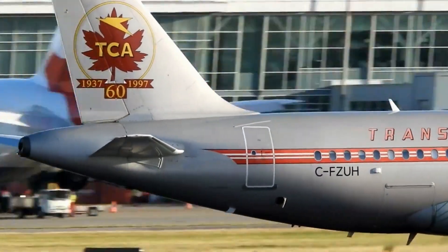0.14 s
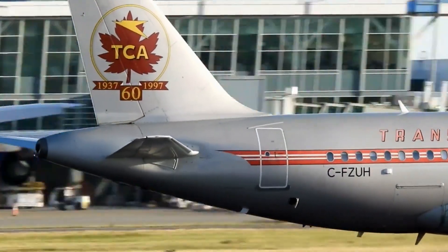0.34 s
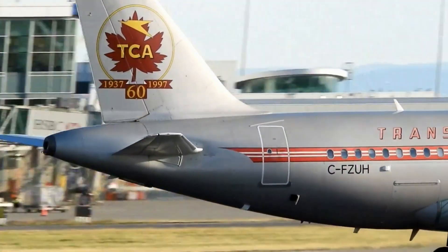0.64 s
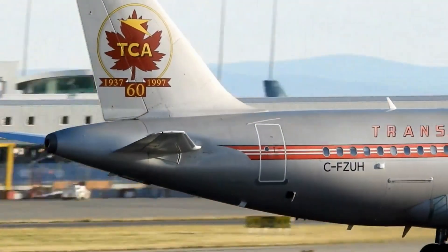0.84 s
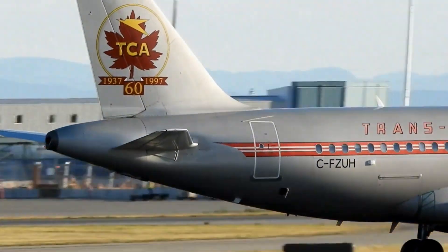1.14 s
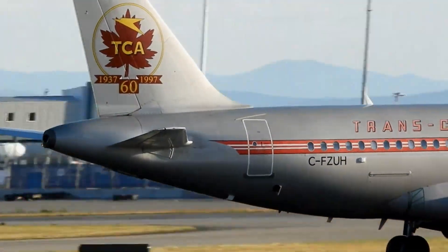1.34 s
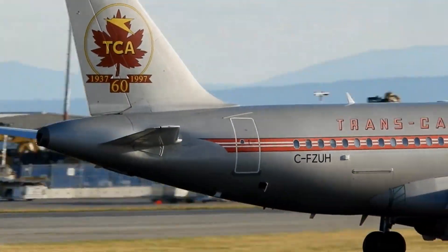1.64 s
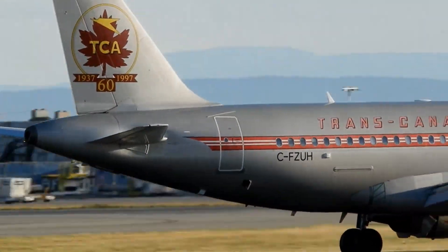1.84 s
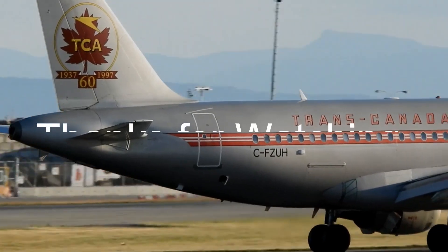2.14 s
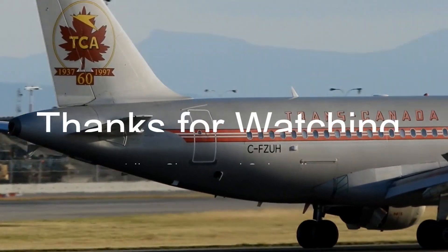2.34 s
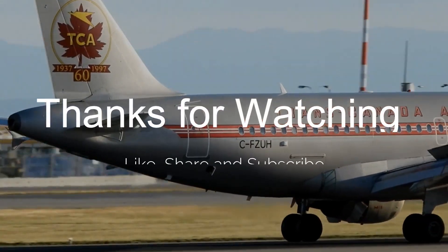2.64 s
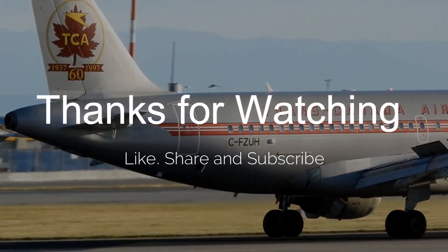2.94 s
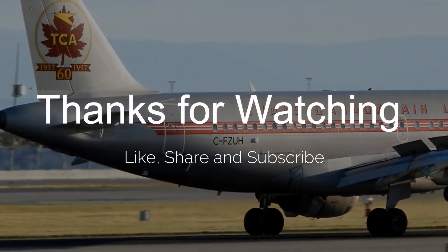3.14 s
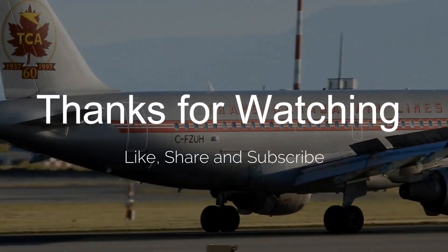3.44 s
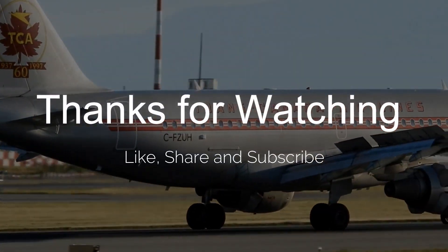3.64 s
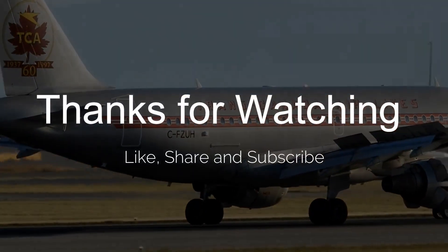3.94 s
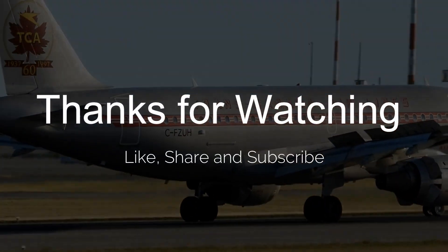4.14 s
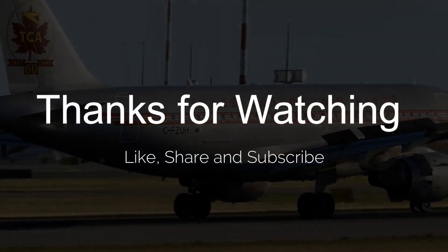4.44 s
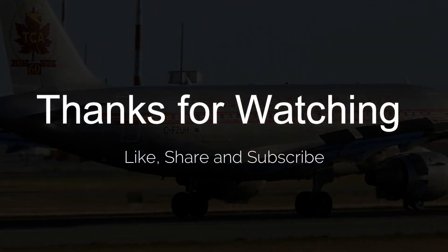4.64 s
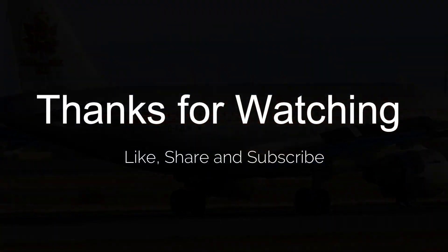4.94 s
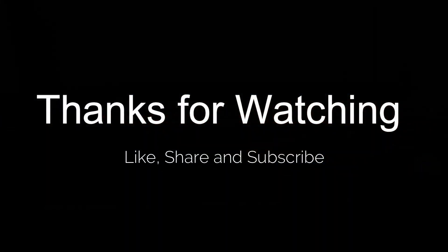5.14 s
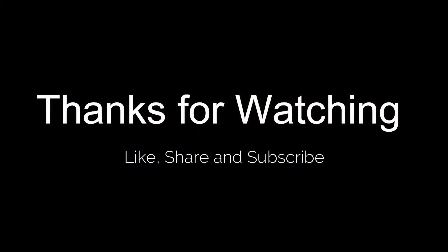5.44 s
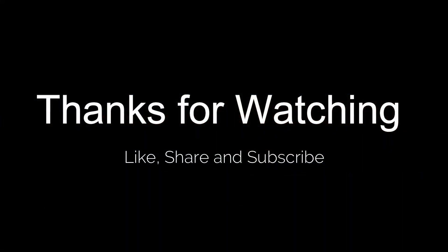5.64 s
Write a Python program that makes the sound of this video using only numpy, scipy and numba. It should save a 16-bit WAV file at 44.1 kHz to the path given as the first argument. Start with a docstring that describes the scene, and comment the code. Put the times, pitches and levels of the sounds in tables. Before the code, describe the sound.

An airliner rolls along a runway with engines in reverse: a dense, surging broadband roar over a shaky low drone, strongest at the start. Midway, a small bird close on the right gives a quick run of sharp chirps, while low gusts bump the microphone. Open airfield, stereo outdoor microphone with faint hiss. From about halfway the whole sound fades evenly to silence.

```python
"""A turbulent jet roar surges over a low drone: an airliner rolls along a runway in reverse thrust.
The roar is noise shaped in octaves, coloured by resonances, reflections and cancellations; the drone is a shaken tone.
Light gusts, as low-frequency noise bursts, buffet the microphone, and a small bird chirps close by
on the right in swept sines. The recorder adds faint filtered hiss, and everything is faded out."""
import sys
import numpy as np
from scipy import signal
from scipy.fft import rfft, irfft, next_fast_len
from scipy.io import wavfile
from numba import njit

SR = 44100
rng = np.random.default_rng(int(sys.argv[2]) if len(sys.argv) > 2 else 0)


def unload_wav(signal):
    """Save mono or channel-first audio to the path in sys.argv[1] as 16-bit WAV at rate SR, clipped to [-1, 1]."""
    wavfile.write(
        sys.argv[1],
        SR,
        np.round(np.clip(np.atleast_2d(signal).T, -1, 1) * 32767).astype(np.int16),
    )


N = 255322
TIME = np.arange(N) / SR
FREQ = np.maximum(np.arange(N // 2 + 1) * SR / N, 1)
ROLL_END_S = 5.366  # the fade-out reaches silence here too
TRAVELLED = np.minimum(TIME / ROLL_END_S, 1)  # share of the roll completed


def undb(db):
    """Amplitude ratio from a level: twenty decibels are a factor of ten."""
    return 10 ** (np.asarray(db) / 20)


def unit(x):
    """Normalisation of the mean power: rms 1."""
    return x / np.sqrt(np.mean(x ** 2))


def curves(table):
    """Linear interpolation in time of each column of a table."""
    s, *columns = np.transpose(table)
    return [np.interp(TIME, s, column) for column in columns]


def colour(points):
    """Spectral envelope in dB: points (f/Hz, level/dB) joined on a log-frequency axis."""
    hz, db = np.transpose(points)
    return np.interp(np.log(FREQ), np.log(hz), db)


def filtered(x, gain):
    """Linear filtering: the spectrum is multiplied by a gain at each frequency."""
    return irfft(rfft(x) * gain, N)


def walk(rate_hz):
    """Low-passed random motion of rms 1, with changes up to about rate_hz a second."""
    return unit(filtered(rng.standard_normal(N), np.exp(-(FREQ / rate_hz) ** 2)))


def bell(peak_s, length_s):
    """Gaussian envelope in time, down to 1/e at length_s on either side of its peak."""
    return np.exp(-((TIME - peak_s) / length_s) ** 2)


def turbulence(burst_db, burst_hz):
    """Intermittency of turbulence: noise whose level rises and falls in brief uneven bursts."""
    return rng.standard_normal(N) * unit(undb(burst_db * walk(burst_hz)))


@njit
def resonance(x, hz, width):
    """Second-order band-pass with a moving centre, gain 1 at the centre."""
    y, band, low = np.empty(len(x)), 0., 0.
    for i in range(len(x)):
        g = np.tan(np.pi * hz[i] / SR)
        damping = width / hz[i]
        v = (band + g * (x[i] - low)) / (1 + g * (g + damping))
        band = 2 * v - band
        low = low + 2 * g * v
        y[i] = damping * v
    return y


def buffeting():
    """Wind noise: turbulent pressure on each microphone port, independent between the two."""
    # gusts: t/s of the peak, level/dB
    gust_table = [(.5, -35.5), (3.77, -28.5), (4.45, -32), (5.15, -38.5)]
    # spectrum of the buffeting: f/Hz, relative level per Hz/dB
    buffet_points = [(25, -24.5), (60, -20), (95, -9.5), (150, 2), (220, -1.5), (330, -21), (600, -22.5),
                     (1500, -49.5), (6000, -90.5)]
    rise_s, fall_s, breeze_db = 0.17, 0.21, -47.5  # times to change by a factor e
    wind = undb(breeze_db)
    for peak_s, db in gust_table:
        away = np.maximum((peak_s - TIME) / rise_s, (TIME - peak_s) / fall_s)
        wind = wind + undb(db) * np.exp(-away)
    gain = undb(colour(buffet_points))
    ports = [unit(filtered(turbulence(burst_db=3.0, burst_hz=22), gain)) for _ in range(2)]
    return wind * np.array(ports)


def bird(far_ear_db, far_ear_lag_s, rough, fall_rough, echo_db, echo_s):
    """Frequency modulation: whistles sweep to a sharp top and drop more roughly, with a faint echo."""
    # chirps: t/s at the top, rise/s, fall/s, start f/Hz, top f/Hz, end f/Hz, level/dB
    chirp_table = [ (1.7, .04, .055, 8330, 8400, 8300, -58.5), (1.778, .035, .04, 8400, 8920, 8550, -54),
                   (2.682, .013, .022, 4800, 6650, 5450, -30.5), (2.878, .022, .012, 3600, 3800, 3700, -36),
                   (2.958, .006, .036, 4200, 4450, 3950, -31.5),
                   (3.010, .021, .017, 4200, 6200, 4150, -29.5),
                   (3.164, .011, .012, 4550, 5000, 4650, -30.5),
                   (3.221, .033, .027, 3700, 6750, 5100, -28.5), (3.489, .007, .018, 4050, 4200, 3950, -31),
                   (3.530, .022, .024, 4050, 5950, 3850, -32), (3.683, .013, .012, 4150, 5050, 4200, -30.5),
                   (3.738, .021, .029, 4400, 6800, 5300, -28)]
    song = np.zeros(N)
    wobble = walk(500)
    for top_s, rise, fall, start_hz, top_hz, end_hz, db in chirp_table:
        on = (TIME > top_s - rise) & (TIME < top_s + fall)
        t = TIME[on] - top_s
        rising = t < 0
        away = np.where(rising, -t / rise, t / fall)  # 0 at the top, 1 at either foot
        foot_hz = np.where(rising, start_hz, end_hz)
        sweep_hz = foot_hz + (top_hz - foot_hz) * (1 - away) ** 1.8
        hz = sweep_hz * (1 + np.where(rising, rough, fall_rough) * wobble[on])
        whistle = np.sqrt(2) * np.sin(2 * np.pi * np.cumsum(hz) / SR)
        song[on] += undb(db) * (1 - away ** 6) * whistle
    # diffuse echo: decaying noise, different at each ear
    tail = rng.standard_normal((2, SR // 4)) * np.exp(-TIME[:SR // 4] / echo_s)
    echo = signal.fftconvolve(song[None], tail / np.linalg.norm(tail[0]), axes=1)[:, :N]
    # the left side is shaded and hears it a little later
    left = undb(far_ear_db) * np.interp(TIME - far_ear_lag_s, TIME, song)
    return np.array([left, song]) + undb(echo_db) * echo


def drone(waver, waver_hz):
    """Tone with random modulation: turbulence shakes the strength and phase of a sagging engine tone."""
    # the drone, strongest at first: t/s, level before the overall scaling/dB
    drone_table = [(0, -22), (.12, -20.5), (.39, -26.5), (.47, -41), (.8, -30), (1.1, -38), (1.8, -35),
                   (2.15, -30), (2.8, -30.5), (3.65, -30), (3.85, -36), (4.45, -33), (4.85, -39.5),
                   (5.2, -37.5)]
    steady_hz, excess_hz, settle_s = 158.6, 5.756, 0.76
    level_db, = curves(drone_table)
    hz = steady_hz + excess_hz * np.exp(-TIME / settle_s)
    shaken = 1 + waver * (walk(waver_hz) + 1j * walk(waver_hz))
    tone = np.real(shaken * np.exp(2j * np.pi * np.cumsum(hz) / SR))
    return undb(level_db) * unit(tone)


def thrust():
    """Spectral balance of jet noise: slow level curves of rumble, roar and hiss (dB)."""
    # each of the three: t/s, level change/dB; the wind carries the roar
    rumble_table = [(0, -2), (.11, 3.5), (.36, 2.5), (.5, -5), (.7, -1), (.9, 1.5), (1.0, -2.5), (1.15, 2),
                    (1.35, 0.5), (1.55, -1), (1.85, -1), (2.05, -0.5), (2.55, 0.5), (3.4, 0), (3.55, -2.5),
                    (3.8, -4), (4.25, 2), (4.85, -1), (5.2, -4)]
    roar_table = [(0, 2), (.1, 5.5), (.22, 4), (.28, 1.5), (.42, 4), (.6, 2.5), (.8, 0.5), (.88, -4),
                  (.98, -3.5), (1.1, -1.5), (1.27, 3.3), (1.38, 1), (1.62, 2), (1.82, -0.5), (2.0, 1),
                  (2.2, 2), (2.55, 1.5), (2.68, -6.5), (2.85, -1), (3.05, 1.5), (3.15, 1), (3.3, 2),
                  (3.54, -2), (3.78, 0.5), (3.85, -2), (3.95, 1.5), (4.2, 1.5), (4.3, 4), (4.4, 2),
                  (4.8, 1.5), (4.92, 0.5), (5.2, -1.5)]
    hiss_table = [(0, 2.5), (.2, 2.5), (.3, 6.5), (.4, 7), (.58, 3.8), (.78, -2.5), (.93, -2), (1.04, 3),
                  (1.25, 1), (1.55, -2), (1.86, -2), (1.96, 3.5), (2.07, 2), (2.3, 3), (2.55, 1),
                  (2.8, -2.5), (3.35, -3), (3.88, -2), (4.06, 0), (4.2, 2.5), (4.42, 5), (4.75, 2),
                  (5.2, -2.5)]
    return [curves(table)[0] for table in (rumble_table, roar_table, hiss_table)]


def surges(rumble_db, roar_db, hiss_db, flutter_db, flutter_hz, flicker_db, billow_db, flicker_hz):
    """Level modulation by octave: slow surges, a shared quick flutter and a flicker of its own."""
    anchors = np.log([300, 920, 4200])  # centres of rumble, roar and hiss (Hz)
    flutter = flutter_db * walk(flutter_hz)
    bands = []
    for hz in 70 * 2. ** np.arange(8):
        low, mid, high = (np.interp(np.log(hz), anchors, row) for row in np.eye(3))
        slow = low * rumble_db + mid * roar_db + high * hiss_db
        # the largest eddies make the rumble billow more than the hiss
        flicker = (flicker_db + low * billow_db) * walk(flicker_hz)
        bands.append((hz, slow + flutter + flicker))
    return bands


def through_wind(source, shape_db, bands):
    """Time-varying filtering: coloured noise whose overlapping octaves follow their own level curves."""
    size = next_fast_len(N)
    spectrum = rfft(unit(filtered(source, undb(shape_db))), size)
    hz = np.maximum(np.arange(len(spectrum)) * SR / size, 1)
    octave = np.clip(np.log2(hz / bands[0][0]), 0, len(bands) - 1.0)
    total = 0
    for k, (_, db) in enumerate(bands):
        share = np.maximum(1 - abs(octave - k), 0)
        total = total + irfft(spectrum * share, size)[:N] * undb(db)
    return total


def brief_swells(x):
    """Band-limited amplitude modulation: brief swells of the noise, each around its own pitch."""
    # swells: t/s at the peak, half length/s, f/Hz, width/Hz, boost (0 = none)
    swell_table = [(0.1, 0.047, 240, 120, .7), (0.161, .04, 1400, 800, 0.32), (0.716, 0.028, 320, 116, .8),
                   (0.932, 0.0089, 700, 250, 1), (1.315, 0.028, 290, 160, 1.1),
                   (1.409, 0.0055, 700, 397, 1.5), (1.85, 0.028, 470, 220, .7),
                   (2.727, 0.017, 720, 300, 1.7), (2.79, .018, 380, 400, .8),
                   (3.257, 0.0021, 750, 900, 1.8), (3.393, 0.0067, 280, 161, .8),
                   (4.283, 0.012, 850, 300, 1.7), (4.634, 0.018, 700, 400, 0.715),
                   (4.82, .025, 341, 120, .9)]
    lifts = 0
    for peak_s, length_s, hz, width, boost in swell_table:
        band = resonance(x, np.full(N, float(hz)), float(width))
        lifts = lifts + boost * bell(peak_s, length_s) * band
    return x + lifts


def wandering(x, wander, wander_hz, swell_db, notch_wander, body_flicker_db, body_flicker_hz):
    """Moving resonance and interference: peaks glide and swell, a hollow comes and goes, a notch drifts."""
    # broad resonance, the body of the roar: t/s, f/Hz before wander, boost before flicker (0 = none)
    body_table = [(0, 634, .05), (.75, 656, .05), (1.05, 744, 0.7), (1.35, 740, 0.78), (1.8, 770, 0.68),
                  (2.1, 710, 0.49), (2.45, 720, 0.23), (2.7, 693, 0.94), (3.0, 716, 0.77), (3.3, 728, 0.62),
                  (3.75, 724, 1), (4.15, 723, 0.62), (4.45, 670, .1), (5.2, 629, 0.55)]
    # narrow resonances sinking in pitch: t/s at the fullest, length/s, f/Hz and width/Hz,
    # boost (0 = none); frequency and boost are those before wander and swell
    strand_table = [(.25, .5, 96, 38, 0.66), (.25, 0.48, 850, 70, .45), (0.32, 0.39, 1330, 170, 0.55),
                    (1.4, .25, 1060, 130, 0.85), (1.06, .4, 1300, 60, 0.36), (1.1, .5, 1750, 220, 0.33),
                    (2.38, 0.34, 1190, 120, 0.47), (2.1, 0.24, 1814, 160, .25), (3.28, 0.12, 1350, 220, .4),
                    (3.5, 0.39, 1160, 60, .55), (3.9, 0.35, 1420, 129.8, 1), (4.35, 0.37, 1080, 69.5, 0.54),
                    (4.35, .45, 3600, 400, .35)]
    # ground reflection hollowing the roar below its body: t/s, f/Hz, depth (0-1)
    hollow_table = [(0, 428, 0), (.8, 425, 0.3), (.95, 460, 0.8), (1.12, 440, 0.3), (1.88, 436, .05),
                    (2.05, 477, 1), (2.25, 480, 0.6), (2.6, 446, .05), (3.35, 457, 0.4), (3.7, 478, 0.4),
                    (4.2, 448, 0.8), (5.2, 440, 0.3)]
    body_width_hz, hollow_width_hz, sink_hz_per_s = 110., 110., 12
    notch_start_hz, notch_end_hz, notch_width_hz, notch_depth = 2794, 2645, 120., .9

    body_hz, body_boost = curves(body_table)
    strength = body_boost * undb(body_flicker_db * walk(body_flicker_hz))
    x = x + strength * resonance(x, body_hz * (1 + wander * walk(wander_hz)), body_width_hz)
    for full_s, length_s, hz, width, boost in strand_table:
        centre = (hz - sink_hz_per_s * (TIME - full_s)) * (1 + wander * walk(wander_hz))
        strength = boost * bell(full_s, length_s) * undb(swell_db * walk(wander_hz))
        x = x + strength * resonance(x, centre, float(width))
    hollow_hz, depth = curves(hollow_table)
    x = x - np.clip(depth, 0, 1) * resonance(x, hollow_hz, hollow_width_hz)
    # a cancellation between direct and reflected sound slides down along the roll
    slide_hz = notch_start_hz + (notch_end_hz - notch_start_hz) * TRAVELLED
    notch_hz = slide_hz * (1 + notch_wander * walk(2.6))
    return x - notch_depth * resonance(x, notch_hz, notch_width_hz)


def multipath(x, echo_db, above_hz, longest_s, drift_s, count):
    """Comb filtering: short echoes over paths drifting with the air ripple the upper roar."""
    upper = filtered(x, 1 / (1 + (above_hz / FREQ) ** 4))
    delays = rng.uniform(longest_s / 10, longest_s, count)
    echoes = sum(np.interp(TIME - delay - drift_s * walk(0.51), TIME, upper) for delay in delays)
    return x + undb(echo_db) * echoes / np.sqrt(count)


def exhaust(rumble_db, roar_db, hiss_db):
    """Direct and diffuse sound: roar from straight ahead, its scattered part opposed between the ears."""
    # reversed exhaust, straight from the engines: f/Hz, relative level per Hz/dB
    jet_points = [(20, -34), (45, -24.5), (100, -20), (140, -3.5), (190, 3), (260, -2.5), (750, -6),
                  (1500, -8), (3000, -13.5), (4500, -15.5), (6400, -21.5), (8200, -43.5), (10000, -64.5),
                  (15500, -71.5)]
    # roar scattered back from all sides: f/Hz, relative level per Hz/dB
    scatter_points = [(60, -29), (160, -15.5), (300, -10), (560, -12), (800, -8.5), (1750, -7), (2400, -8),
                      (2750, -9.5), (3100, -9.5), (4500, -9), (6500, -15.5), (7700, -27), (10000, -51.5)]
    # resonances and cancellations of nearby surfaces: f/Hz, width/Hz, first level/dB, last level/dB
    site_table = [(64.9, 14, 13.5, 11.5), (88, 26, 0, -5), (332.2, 69.6, 10, 6.5), (436, 42, -5, -2.5),
                  (490, 55, 6, -4), (603, 60, 5, 6.5), (714, 116, 5, 7.5), (808, 124, 5.5, -1.5),
                  (939.5, 101, -10, -12), (1210, 720, 1.5, 5), (1553, 226, -4.5, -5),
                  (2026, 90, -7.5, -1.5), (2347, 170, 2.5, 3), (2696, 270, -7, -4), (3530, 200, 2, 3.5),
                  (4024, 120, -9, 0), (4420, 180, 1, 4.5), (4780, 240, -3.5, 0), (6300, 190, -2, -6.5),
                  (6820, 240, 0.5, -5.5)]
    # balance of the ears: f/Hz, left minus right level/dB
    port_points = [(1500, 0), (2800, 0), (4300, -3.5), (5500, -1.5), (6600, -5), (9000, -5.5)]
    jet_db, scatter_db = -22, -39
    bands = surges(rumble_db, roar_db, hiss_db, flutter_db=0.21, flutter_hz=23.9,
                   flicker_db=1.0, billow_db=1.03, flicker_hz=27.34)
    source = brief_swells(turbulence(burst_db=0.5, burst_hz=200))
    source = wandering(source, wander=0.028, wander_hz=2.0, swell_db=4.5, notch_wander=0.0065,
                       body_flicker_db=2, body_flicker_hz=12)
    # the colour of the surroundings passes from its first to its last state along the roll
    direct = 0
    for k, share in enumerate((1 - TRAVELLED, TRAVELLED)):
        site_db = sum(db[k] * np.exp(-2 * ((FREQ - hz) / width) ** 2) for hz, width, *db in site_table)
        direct = direct + share * through_wind(source, colour(jet_points) + site_db, bands)
    direct = undb(jet_db) * multipath(direct, echo_db=-9.5, above_hz=560, longest_s=.014,
                                      drift_s=0.00016, count=6)
    # sound from many directions evens out part of the surging
    evened = [(hz, 0.72 * db) for hz, db in bands]
    scattered = through_wind(rng.standard_normal(N), colour(scatter_points), evened)
    scattered = undb(scatter_db) * scattered
    balance_db = colour(port_points) / 2
    left = filtered(direct, undb(balance_db)) + scattered
    right = filtered(direct, undb(-balance_db)) - scattered
    return np.array([left, right])


def scene():
    """Superposition of wind on the microphone, the bird, the engine drone and the exhaust roar."""
    chirps = bird(far_ear_db=-8, far_ear_lag_s=.00005, rough=.008, fall_rough=.015,
                  echo_db=-9, echo_s=.016)
    jet = exhaust(*thrust()) + drone(waver=0.21, waver_hz=18)
    return buffeting() + chirps + jet


def record(dry):
    """Recording chain: additive electronic hiss, a straight fade to silence and a steep low-pass."""
    self_noise_db, fade_start_s, top_hz = -56, 2.524, 15600
    hiss_colour = colour([(100, -3.0), (9000, 3.5), (12000, -3.0), (15500, -11.5)])
    hiss = unit(filtered(rng.standard_normal((2, N)), undb(hiss_colour)))
    fader = np.clip((ROLL_END_S - TIME) / (ROLL_END_S - fade_start_s), 0, 1)
    faded = (dry + undb(self_noise_db) * hiss) * fader
    low_pass = signal.ellip(8, .2, 70, top_hz, fs=SR, output="sos")
    return signal.sosfilt(low_pass, faded)


dry = scene()
out = record(dry)
unload_wav(out)
```